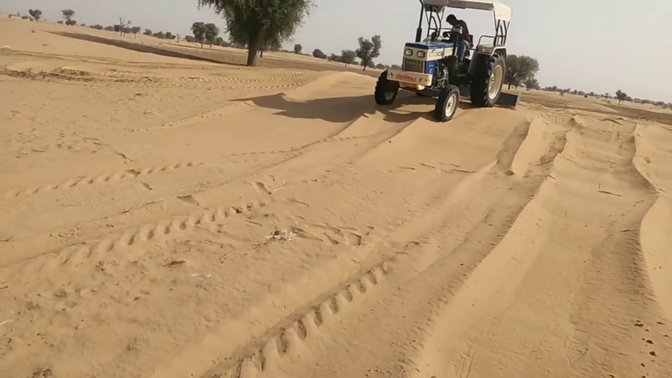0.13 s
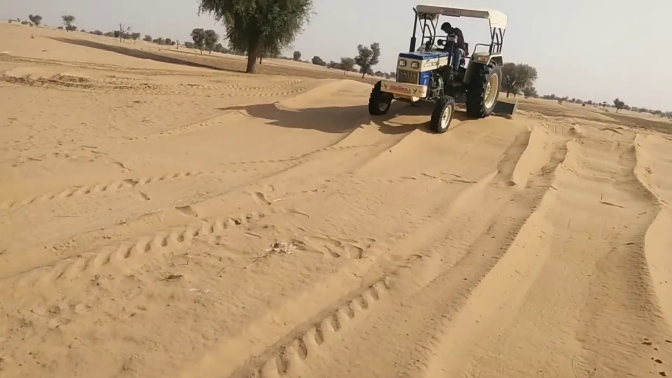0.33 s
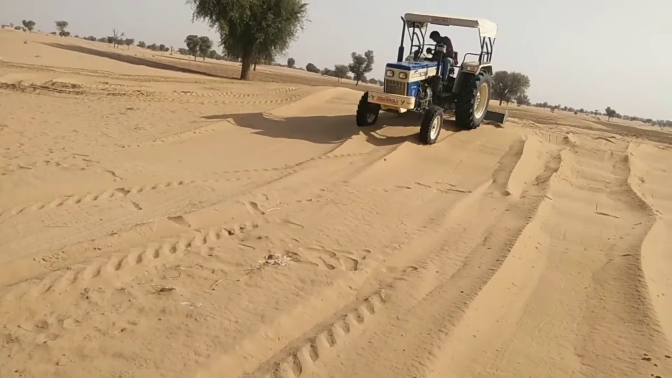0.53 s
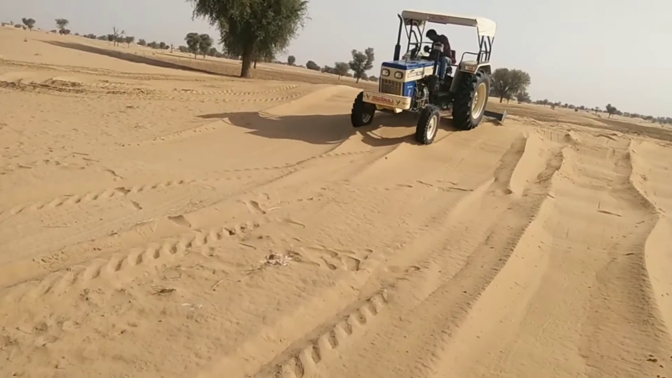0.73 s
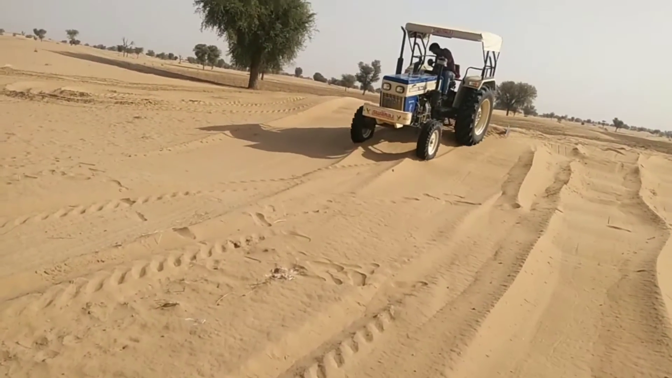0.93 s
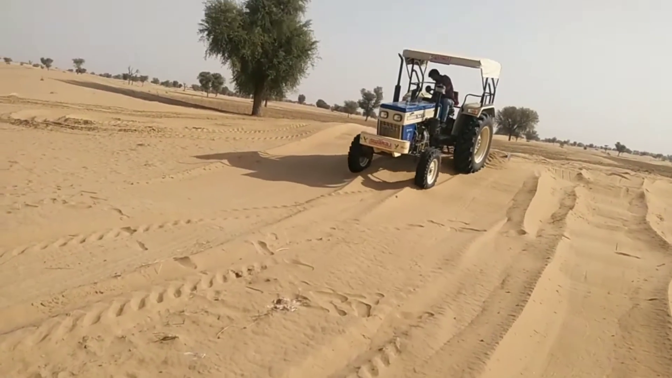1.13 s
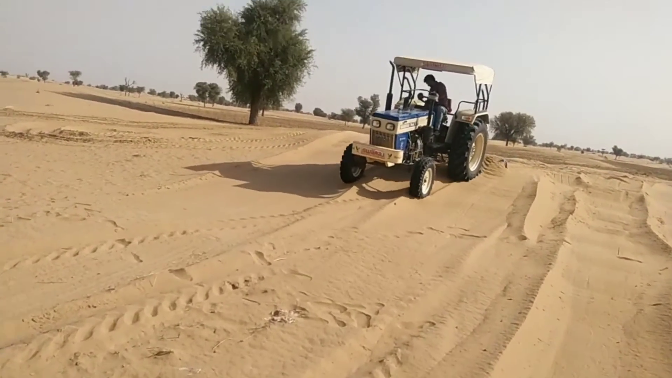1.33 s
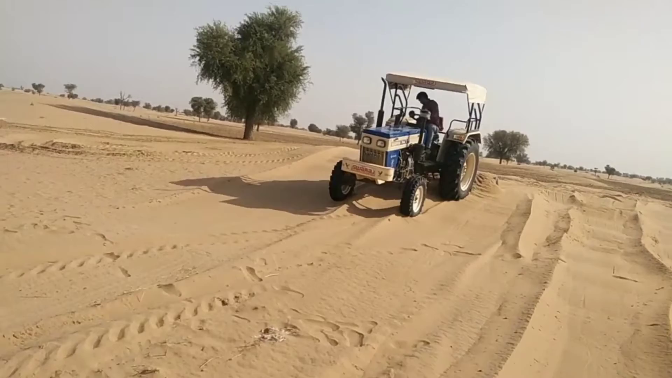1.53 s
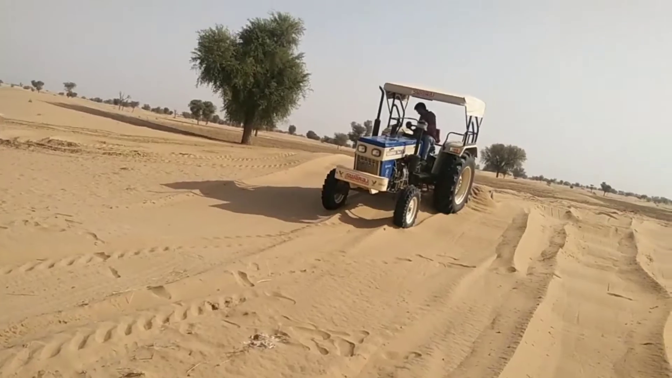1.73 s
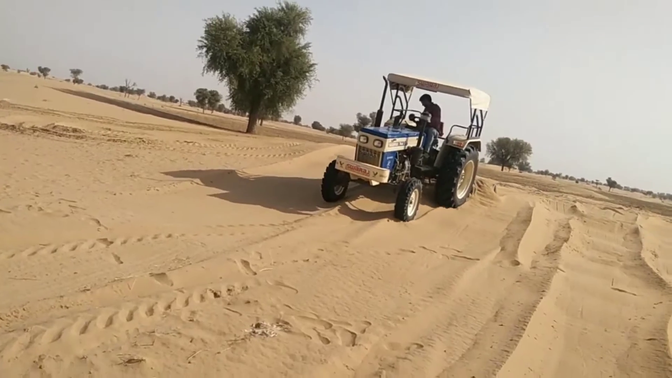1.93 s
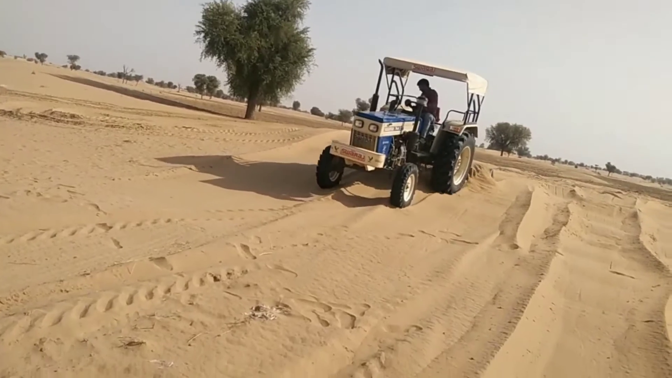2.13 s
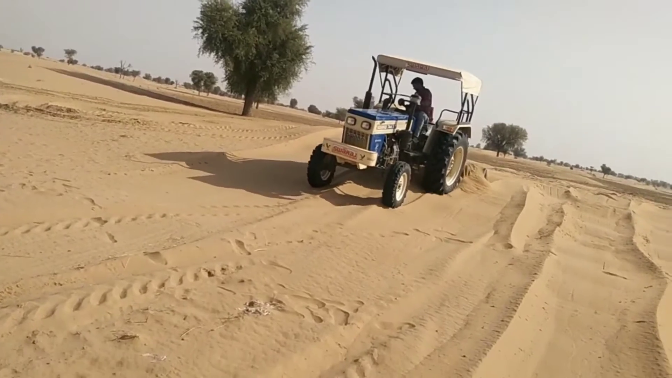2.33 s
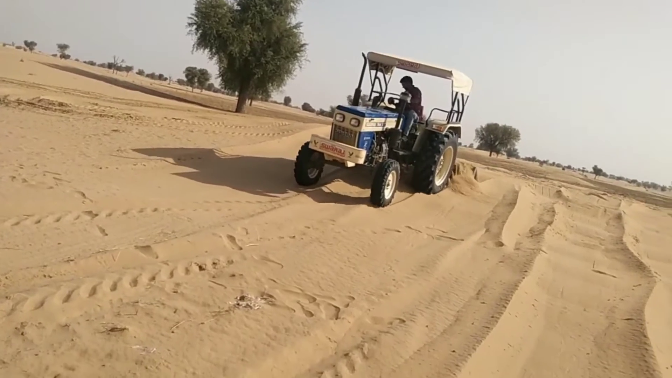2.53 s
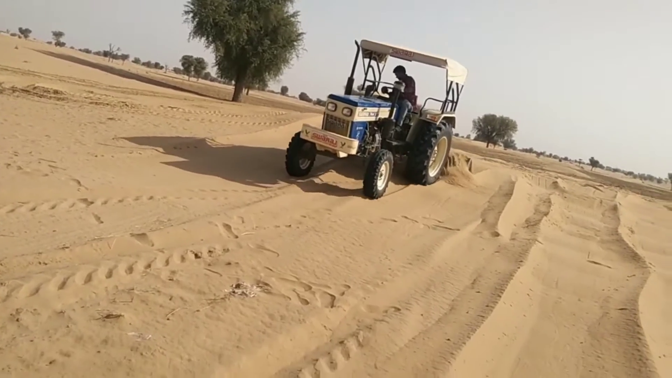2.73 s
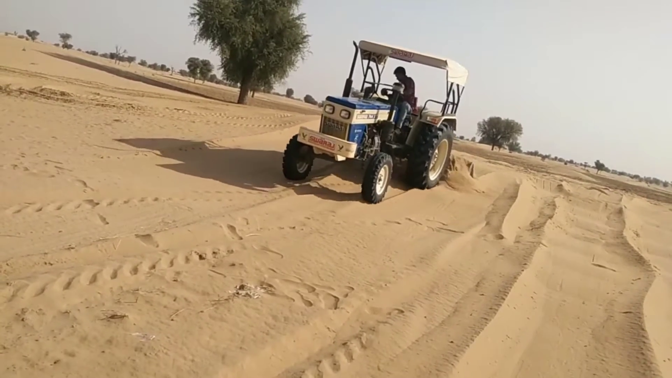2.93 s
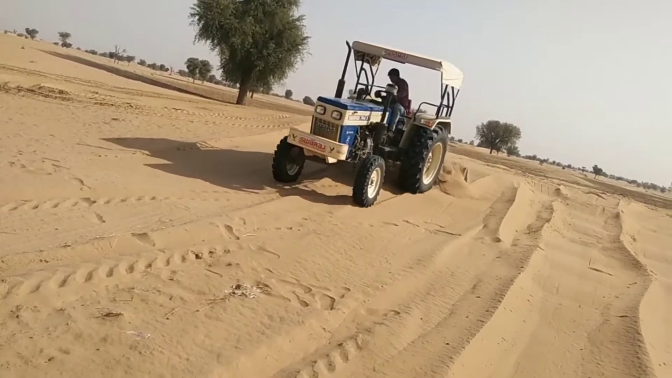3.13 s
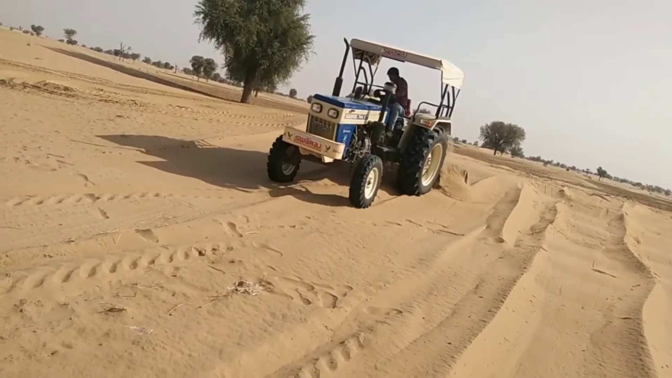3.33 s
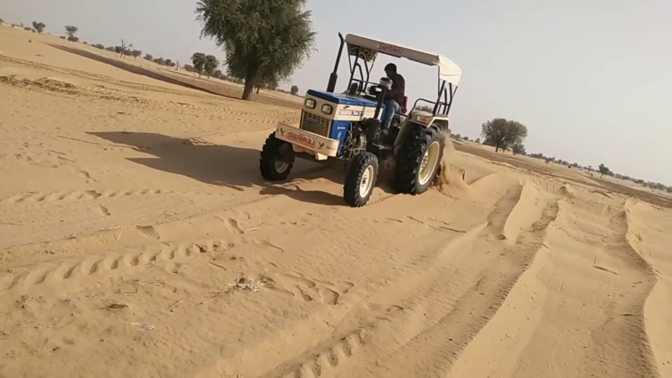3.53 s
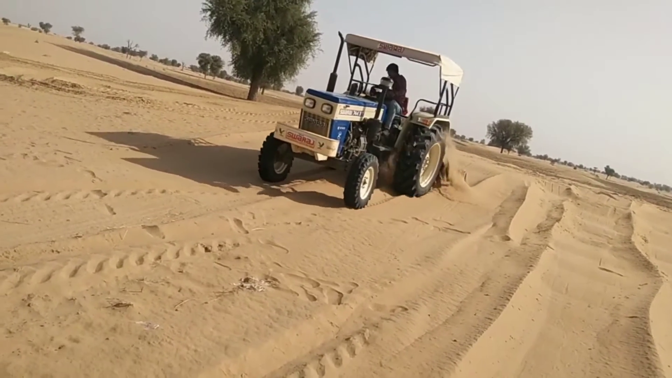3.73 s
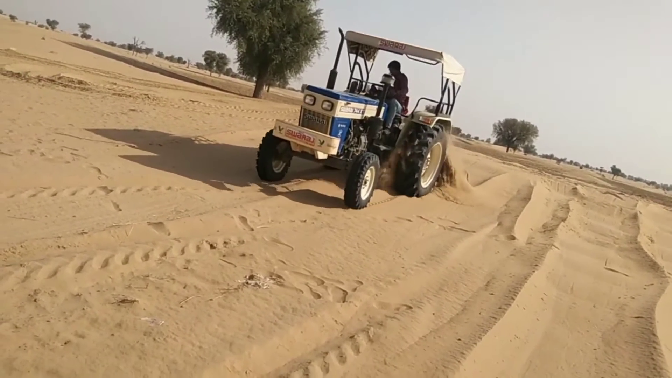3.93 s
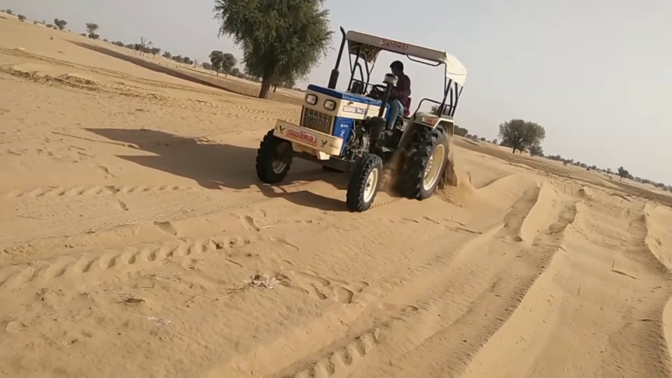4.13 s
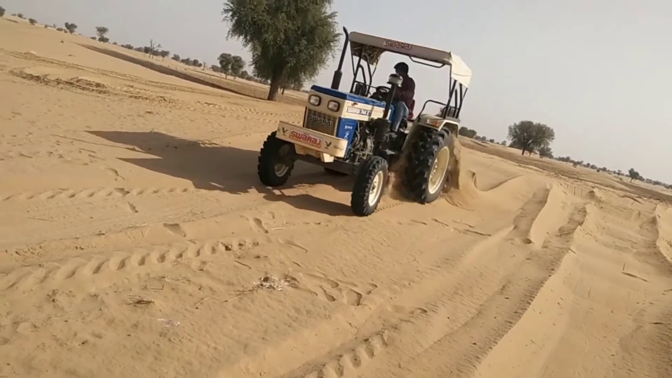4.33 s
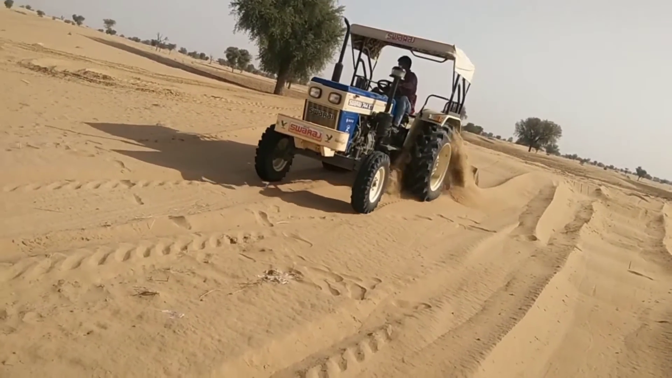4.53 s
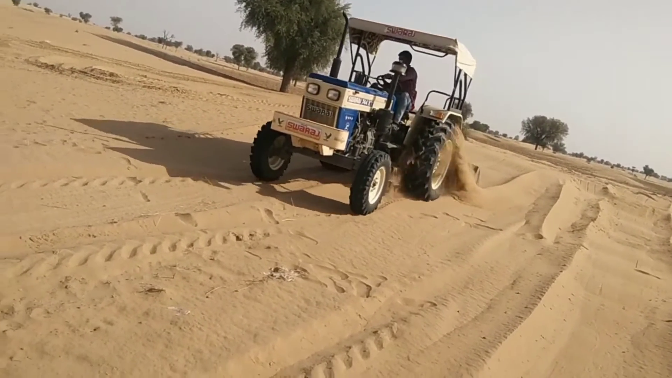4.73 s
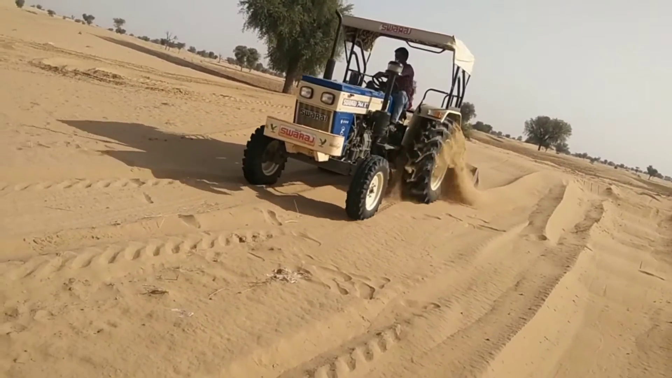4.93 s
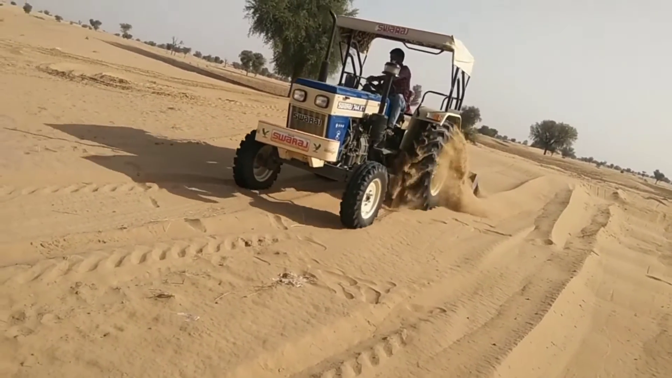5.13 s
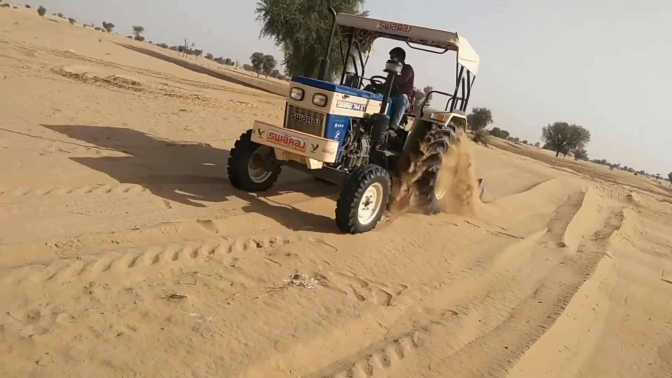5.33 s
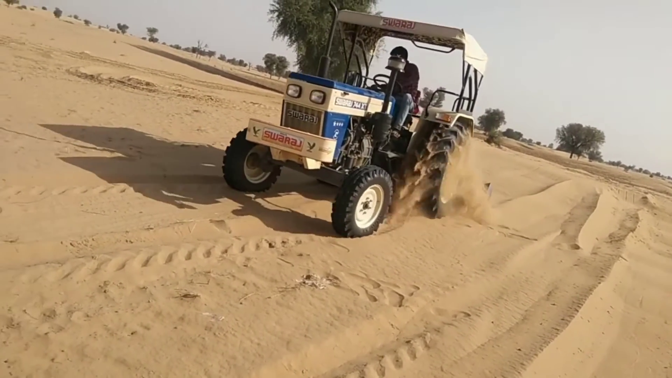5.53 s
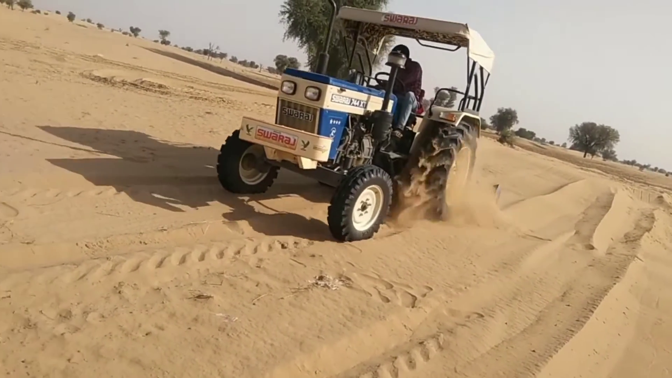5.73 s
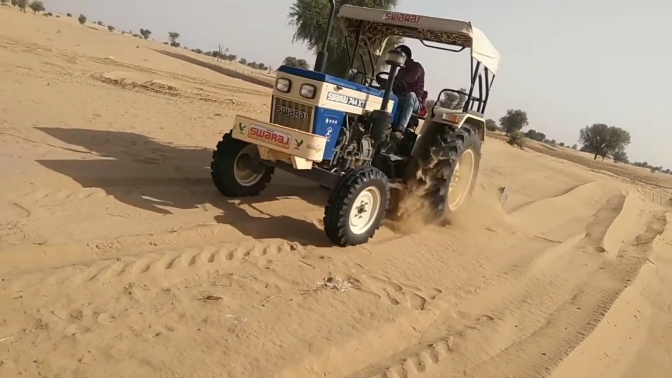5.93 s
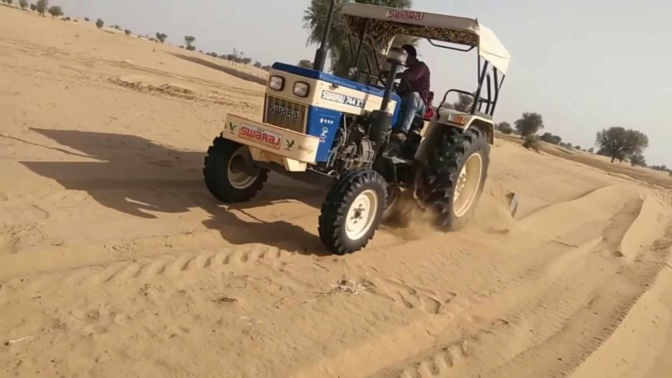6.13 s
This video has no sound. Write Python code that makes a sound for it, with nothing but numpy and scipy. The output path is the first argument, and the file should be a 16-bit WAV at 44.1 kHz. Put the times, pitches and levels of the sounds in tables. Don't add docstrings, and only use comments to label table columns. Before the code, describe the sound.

A tractor engine works hard in dry dunes, approaching the microphone. At first the metallic rattle is lighter; a brief surge comes before one second, then full loaded clatter settles in. Irregular linkage clanks, bonnet shudders and short hollow exhaust barks break the steady roar, while a bright injector hiss and pulsing sandy spray run throughout. The sound is close, dense and outdoors.

```python
import sys
import numpy as np
from scipy import signal
from scipy.fft import rfft, irfft
from scipy.io import wavfile
from scipy.ndimage import uniform_filter1d, map_coordinates

SR = 44100
rng = np.random.default_rng(int(sys.argv[2]) if len(sys.argv) > 2 else 0)


def unload_audio(sound):
    columns = np.transpose(np.atleast_2d(sound))
    steps = np.round(np.clip(columns, -1, 1) * 32767)
    wavfile.write(sys.argv[1], SR, steps.astype(np.int16))


def ratio_of_db(decibels):
    return 10 ** (np.asarray(decibels, float) / 20)


N = 272538
TIME_S = np.arange(N) / SR


def rms_one(x):
    return x / np.sqrt(np.mean(x ** 2) + 1e-20)


def in_time(rows):
    times_s, values = np.transpose(rows)
    return np.interp(TIME_S, times_s, values)


def drift(rate_hz):
    step = 40
    r = np.exp(-2 * np.pi * step * rate_hz / SR)
    slow = signal.lfilter([1], [1, -2 * r, r * r], rng.standard_normal(N // step + 2002))[2000:]
    return np.interp(np.arange(N) / step, np.arange(len(slow)), rms_one(slow))


def evened(x):
    return x / np.sqrt(uniform_filter1d(x ** 2, size=5000) + 1e-12)


def swells(times_s, heights_db, length_s):
    return sum(db * np.exp(-((TIME_S - s) / length_s) ** 2) for s, db in zip(times_s, heights_db))


def level(full_load_db, load_share, db_per_s, db_per_lean):
    # (time [s], level [dB])
    load = [(0.0, -25), (0.3, -25), (0.66, -23), (0.77, -19.5), (0.85, -23.5), (1.23, -22.5), (1.29, -18.5),
            (1.42, -17.5), (2.3, -17.5), (3.18, -17.5), (3.42, -20), (3.85, -17), (4.08, -20),
            (4.45, -17.5), (4.75, -18.5), (5.33, -17), (5.75, -19), (6.1, -16.5)]
    # (time [s], lean [-1..1])
    lean = [(0, -0.69), (3.0, 0.19), (3.6, -0.49), (4.4, -0.34), (4.7, 0.6), (5.0, 0.67), (5.45, 0.069),
            (5.8, -0.24), (6.18, 0.19)]
    pull_db = in_time(load) + 18
    approach_s = TIME_S - 3.5
    return full_load_db + load_share * pull_db + db_per_s * approach_s + db_per_lean * in_time(lean)


def body(drive, modes, patchy_db):
    out = 0
    for k, (hz, width_hz, level_db) in enumerate(modes):
        r = np.exp(-np.pi * 1.55 * width_hz / SR)
        b = (1 - r * r) / 2 * np.array([1, 0, -1])
        a = [1, -2 * r * np.cos(2 * np.pi * hz / SR), r * r]
        rung = signal.lfilter(b, a, signal.lfilter(b, a, drive))
        out = out + (-1) ** k * ratio_of_db(level_db + patchy_db * drift(1.28)) * rung
    return evened(out)


def coloured(spectrum):
    hz = np.maximum(np.arange(N // 2 + 1) * SR / N, 1)
    points_hz, points_db = np.transpose(spectrum)
    gain = ratio_of_db(np.interp(np.log(hz), np.log(points_hz), points_db, left=-60, right=-80))
    return rms_one(irfft(gain * rfft(rng.standard_normal(N)), N))


def pulse(turns, rise_s, fall_s, spread_db, jitter_s):
    at = np.flatnonzero(np.diff(np.floor(turns)) > 0)
    late_s = jitter_s * rng.standard_normal(len(at))
    kicks = np.zeros(N)
    kicks[np.clip(at + (late_s * SR).astype(int), 0, N - 1)] = ratio_of_db(spread_db * rng.standard_normal(len(at)))
    t = np.arange(int(.08 * SR)) / SR
    shape = (1 - np.exp(-t / rise_s)) * np.exp(-t / fall_s)
    return signal.fftconvolve(kicks, shape / shape.max())[:N]


def metal_drive(swell, ticks_per_s, size_db, hiss_db):
    sizes = ratio_of_db(size_db * np.minimum(rng.exponential(1, N), 3)) * rng.choice([-1, 1], N)
    ticks = rms_one(sizes * (rng.random(N) < ticks_per_s / SR))
    return swell * (ticks + ratio_of_db(hiss_db) * rng.standard_normal(N))


def firing_turns():
    # (time [s], rate [firings/s])
    firing = [(0, 26.84), (.4, 26.94), (.8, 28.15), (1.2, 28.5), (1.6, 30.84), (2, 31.95), (2.4, 31.61),
              (2.8, 30.96), (3.2, 31.69), (3.6, 31.97), (4, 32.06), (4.4, 31.23), (4.8, 29.43), (5.2, 30),
              (5.6, 32.51), (6, 31.57)]
    return .24 + np.cumsum(in_time(firing)) / SR


def combustion(turns):
    knock = pulse(turns + .11, rise_s=.003, fall_s=.0055, spread_db=2.2, jitter_s=.0009)
    rattle = pulse(1.6 * turns, rise_s=.0023, fall_s=.0027, spread_db=3.5, jitter_s=.00058)
    depth_db = level(8, load_share=.6, db_per_s=-.4, db_per_lean=3.5)
    return 1 + (ratio_of_db(depth_db) - 1) * (knock + .42 * rattle) + clanks(drive_db=24)


def engine(drive):
    # (frequency [Hz], width [Hz], level [dB])
    sump = [(1152, 70, 0)]
    block = [(1295, 134, 1.5), (1555, 182, -0.5)]
    bonnet = [(1936, 156, 6.5), (1736, 59, -11)]
    head = [(2134, 152, 2), (2350, 120, -1.5)]
    manifold = [(2578, 290, -0.6), (2763, 284, -3.1)]
    covers = [(3027, 111, 4.5), (3295, 127, 0), (3557, 280, -2.5), (3990, 470, -21.5)]
    # (time [s], level [dB])
    shudders = [(1.58, 3), (2.0, 6), (2.24, 6), (2.6, 1), (3.1, 4), (3.83, 0), (4.4, 3.5), (5.5, 5)]
    shudder_db = swells(*np.transpose(shudders), length_s=.027)
    parts = [(sump, level(-30.5, .6, .94, 2)),
             (block, level(-26.5, .65, .52, .6)),
             (bonnet, level(-25, 1.56, .03, -5) + shudder_db),
             (head, level(-22, 1.37, .48, -1.5)),
             (manifold, level(-22.5, 1.15, -.05, 2.5)),
             (covers, level(-25.5, 1.1, -.57, 2))]
    out = 0
    for modes, level_db in parts:
        out = out + ratio_of_db(level_db - 2.5 + .73 * drift(4.1)) * body(drive, modes, patchy_db=2)
    return out


def tone(turns):
    return ratio_of_db(1.5 * drift(2.5)) * np.sin(2 * np.pi * turns + .35 * drift(1.5))


def exhaust(turns, drive):
    # (multiple of firing rate [-], level [dB])
    hum_lines = [(1.998, -13.5), (2.999, -13), (3.6, -3), (4.901, -12.5), (6.2, -22)]
    # (frequency [Hz], density [dB/Hz])
    rumble = [(5, -26), (25, -17), (45, -11), (80, -5.5), (115, -6), (160, -8), (200, -8.5), (260, -16.5)]
    # (frequency [Hz], width [Hz], level [dB])
    silencer = [(312.5, 27, 0)]
    stack = [(706, 96, -6.5), (822, 86, 0)]
    # (time [s], silencer level [dB], stack level [dB])
    barks = [(2.05, 10, 0.5), (2.63, 13, 1.5), (3.22, 9, 2.5), (3.75, 6.5, 1), (4.05, -6, 7), (4.34, 3, 4),
             (4.55, -2, 7), (4.85, 4, 7), (5.24, 12, 0), (5.47, 9, 5), (5.82, 0, -1), (6.03, 8.5, -1)]
    hum = sum(ratio_of_db(db) * tone(order * turns) for order, db in hum_lines)
    fan = ratio_of_db(level(-3, 2.6, .3, -.6) + 1.5) * tone(2.6 * turns)
    thud = ratio_of_db(level(-37, .2, .25, -2.4)) * (hum + fan)
    low = ratio_of_db(level(-42, .6, -.03, .3)) * evened(coloured(rumble))
    times_s, silencer_bark_db, stack_bark_db = np.transpose(barks)
    silencer_db = level(-53.5, .5, 3.5, -8) + swells(times_s, silencer_bark_db, length_s=.058)
    stack_db = level(-34, 1.04, 1.2, -1) + swells(times_s, stack_bark_db, length_s=.058)
    pipes = ratio_of_db(silencer_db - 7) * body(drive, silencer, patchy_db=-1)
    pipes = pipes + ratio_of_db(stack_db - 2.5) * body(drive, stack, patchy_db=-.5)
    return thud + low + pipes


def injectors(swell, throb):
    # (frequency [Hz], width [Hz], level [dB])
    jets_far = [(6570, 970, 1), (7280, 840, -3.2)]
    jets_near = [(6970, 890, 2.1), (8070, 1080, -2)]
    # (frequency [Hz], density [dB/Hz])
    air = [(6000, 2), (8500, -9.5), (9200, -7.5), (12000, -9), (14000, -6), (15500, -27)]
    squirts = metal_drive(swell, 6000, size_db=-1, hiss_db=5.5)
    near = .5 + .5 * np.tanh((TIME_S - 1.67) / .83)
    hiss = np.sqrt(1 - near) * body(squirts, jets_far, patchy_db=7)
    hiss = hiss + np.sqrt(near) * body(squirts, jets_near, patchy_db=3.5)
    hiss = hiss + ratio_of_db(-7.5) * throb * coloured(air)
    return ratio_of_db(level(-39.5, 1.47, -.4, 1.1) - 2) * hiss


def sand(throb):
    # (frequency [Hz], density [dB/Hz])
    churn = [(200, -9), (260, -4.5), (450, -6), (700, 1.5), (1000, -0.5), (2000, -4), (3500, -10.5),
             (4300, -9.5)]
    spray = [(3800, -2.5), (4500, 4), (5600, 1), (6400, -2)]
    churn_db = level(-46, .53, .93, -4.5) + 10.5
    spray_db = level(-43.5, 1.03, .86, -.3)
    return throb * (ratio_of_db(churn_db) * coloured(churn) + ratio_of_db(spray_db) * coloured(spray))


def tyre_grind(throb):
    # (frequency [Hz], width [Hz], level [dB])
    tyres = [(1060, 184, 0)]
    dip_db = swells([4.5], [-28], length_s=.8)
    grind_db = level(-36.5, 1.25, -.94, -12) + dip_db
    return ratio_of_db(grind_db - 4) * body(throb * rng.standard_normal(N), tyres, patchy_db=4)


def clanks(drive_db):
    # (time [s], peak level [dB])
    blows = [(0.7566, -2), (1.3895, -4), (1.5543, -4), (1.653, -16), (1.974, -9), (2.0304, -12),
             (2.384, -19), (2.602, -13), (2.6718, -23), (2.7616, 1), (2.8903, -5), (3.304, -8), (3.71, -5),
             (3.8723, 1), (3.9367, -9), (4.278, -10), (4.601, -8), (4.6693, -2), (4.939, -13), (5.079, -2),
             (5.1685, -9), (5.306, 0), (5.334, -5), (5.368, -11), (6.12, -12)]
    kicks = np.zeros(N)
    for s, peak_db in blows:
        kicks[round((s - .002) * SR)] = ratio_of_db(peak_db + drive_db)
    t = np.arange(int(.04 * SR)) / SR
    return signal.fftconvolve(kicks, (1 - np.exp(-t / .0019)) * np.exp(-t / .0016))[:N]


def dune(x):
    lag_ms = .11 - .0027 * (TIME_S - 3.5)
    treble = signal.lfilter(*signal.butter(2, 3660, "high", fs=SR), x)
    return x + .43 * map_coordinates(treble, [np.arange(N) - lag_ms * SR / 1000], order=3)


def scene():
    turns = firing_turns()
    swell = combustion(turns)
    drive = metal_drive(swell, 2500, size_db=2.5, hiss_db=-1.5)
    throb = rms_one(swell ** .61)
    metal = engine(drive) + exhaust(turns, drive)
    mono = dune(metal + injectors(swell, throb) + sand(throb) + tyre_grind(throb))
    return np.array([mono, mono])


def widen(x, repeats):
    thin = signal.lfilter(*signal.butter(1, 130, "high", fs=SR), x)
    out = repeats[0][1] * x
    for delay_ms, gain in repeats[1:]:
        lag = round(delay_ms * SR / 1000)
        out[lag:] += gain * thin[:-lag]
    return out


def band_limit(x):
    return signal.sosfilt(signal.butter(12, 15040, fs=SR, output="sos"), x)


def record(dry):
    # (delay [ms], gain [-])
    left_repeats = [(0.0, 1.0), (15.011, -0.427), (16.508, -0.395), (18.322, 0.589), (19.819, 0.664),
                    (21.315, -0.361), (30.68, 0.464), (32.177, 0.534), (33.673, -0.286)]
    right_repeats = [(0.0, 0.997), (15.011, 0.424), (16.508, 0.564), (18.005, -0.363), (21.315, 0.537),
                     (26.054, 0.61), (30.68, -0.335), (35.873, -0.311), (37.37, -0.35)]
    wide = np.array([widen(dry[0], left_repeats), widen(dry[1], right_repeats)])
    rounded = wide / (1 + np.abs(wide / .97) ** 6) ** (1 / 6)
    return band_limit(rounded)


dry = scene()
out = record(dry)
unload_audio(out)
```